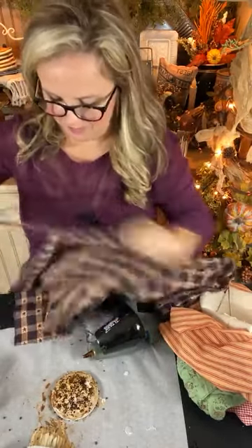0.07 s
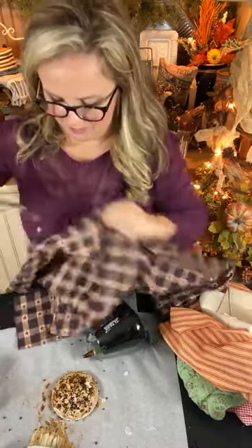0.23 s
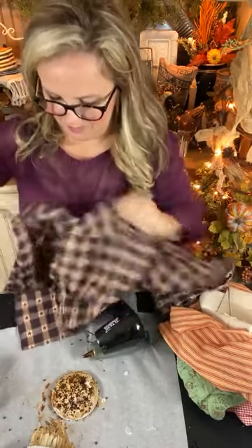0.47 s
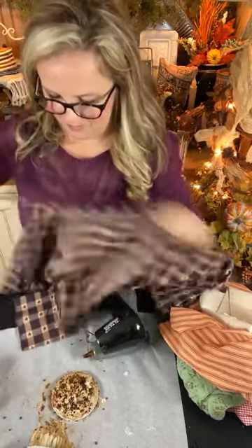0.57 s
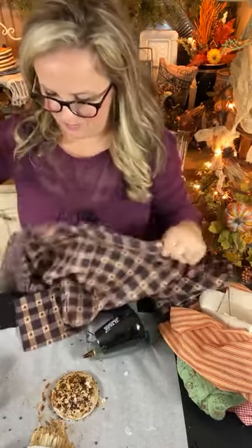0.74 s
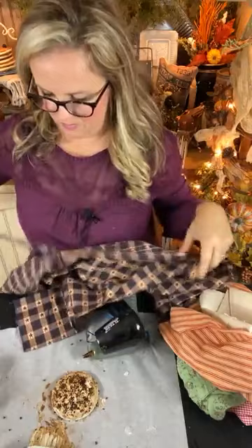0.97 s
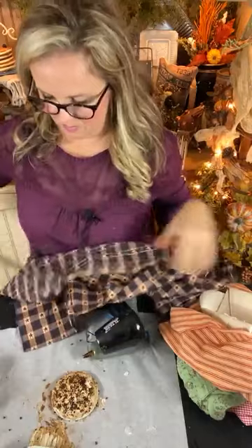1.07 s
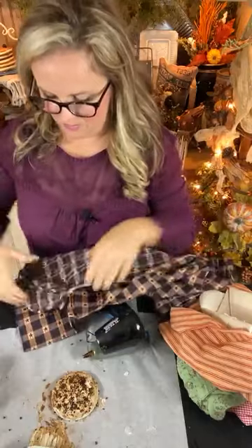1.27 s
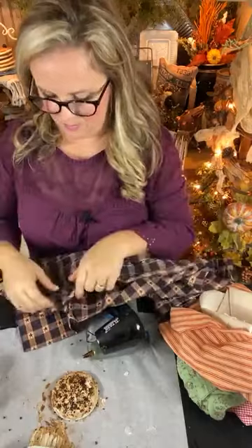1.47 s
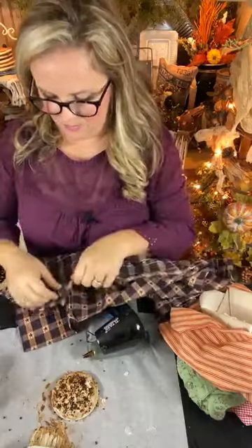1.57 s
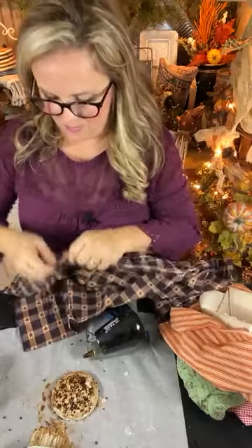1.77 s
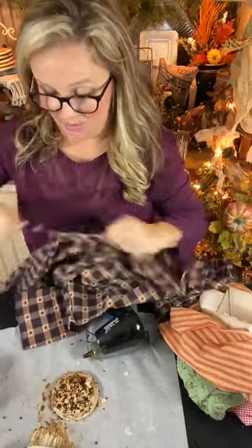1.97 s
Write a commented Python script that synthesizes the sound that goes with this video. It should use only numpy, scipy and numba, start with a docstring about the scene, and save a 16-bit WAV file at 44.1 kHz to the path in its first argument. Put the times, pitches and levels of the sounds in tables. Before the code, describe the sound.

Cloth ripped by hand in four quick, sharp pulls, followed by faint rustling.

```python
"""Ripping cloth up close

Cloth is ripped by hand in four quick pulls: threads snap in dense runs and ring the taut weave.
Each pull jolts the microphone with low thumps and slow pushes of air; the biggest overload it.
Hands rustle, and a small furnished room answers briefly over a machine's hiss and steady tone."""
import sys
import numpy as np
from scipy import signal
from scipy.fft import rfft, irfft
from scipy.io import wavfile
from scipy.ndimage import uniform_filter1d
from numba import njit

SR = 44100
rng = np.random.default_rng(int(sys.argv[2]) if len(sys.argv) > 2 else 0)


def transcribe(signal):
    """Save signal, clipped to [-1, 1], as a 16-bit WAV file at the path in sys.argv[1]."""
    frames = np.atleast_2d(signal).T
    limited = np.clip(frames, -1, 1)
    pcm = np.round(limited * 32767).astype(np.int16)
    wavfile.write(sys.argv[1], SR, pcm)


N = 88376

# The shape of each rip, one list of breakpoints per pull:
# time_s, level_db, low_lift_db, mid_lift_db, top_lift_db, flap_db
RIP_SHAPES = [
    [(0, -27, 8, -5, 1, -18), (.005, -34, 11, 11.5, -9, -30.5), (.011, -32, -21, 1, 0, -26),
     (.03, -40, -12, 0.5, -13, -51), (.06, -55, 3, -6, -1, -45)],
    [(.221, -38, 0, 15, 2, -22), (.225, -25, -4.5, 3, 6.5, -25.5), (.233, -20, 2, -1.5, -6.5, -31),
     (.24, -21.5, -1, 3, -6, -27), (.25, -23, 4, 3.5, -3, -22), (.263, -25, 4, 1.5, -2, -36),
     (.276, -25, -5.5, 1, -8.5, -23.5), (.279, -28, 6, -1.5, -5, -33.5), (.3, -55, -5, 4, 11, -48)],
    [(.488, -40, 2, 0, 0, -30), (.491, -14, 0.5, -6.5, -6, -26), (.497, -24.5, 2, 2, 3, -38),
     (.505, -15, 6.5, -4.5, -2.5, -29), (.515, -25.5, -9, 4, 4.5, -31), (.527, -29.5, 7, 1, 2.5, -35),
     (.53, -38, -6, -3, 6, -42), (.545, -53, 0, -5, -5, -50)],
    [(.7365, -44, 11, 13, 27.5, -28), (.7385, -30, -1.5, -1.5, 0, -24), (.7405, -20.5, 7, -4, -8, -40),
     (.747, -24, 1.5, 6.5, 6.5, -28), (.758, -22.5, 0.5, 4, 3, -23.5), (.77, -22.5, 3, 5.5, -1, -32),
     (.777, -24.5, 1, -2, 2, -28), (.78, -30, 5, 0.5, -2, -35), (.792, -32, -1.5, -4, -4.5, -42),
     (.81, -56, -9, 0, 2, -44)],
]
# Single threads that crack out of the run: start_s, level_db
LOUD_THREADS = [(.003, -15.5), (.2265, -24), (.2315, -5), (.2345, -16), (0.247, -18), (.2555, -25),
                (.26, -10), (0.264, -12.5), (0.271, -16), (0.491, -17), (.523, -16), (0.743, -20),
                (0.7873, -20)]
SNAPS_PER_S, SNAP_SCATTER_DB, FUZZ_DB = 2500, 1.5, -3.5
BUNCH_DB, BUNCH_PER_S, CRACK_DECAY_S = 0.5, 350, .0007


def rips(t):
    """Threads snap in bunches over fibre fuzz and ring the weave; the taut sheet flaps low beneath."""
    gain, lift_db, flap_gain = np.zeros(N), np.zeros((3, N)), np.zeros(N)
    for shape in RIP_SHAPES:
        time_s, level_db, *lifts, flap_db = np.array(shape).T
        pulling = (t >= time_s[0]) & (t <= time_s[-1])
        gain[pulling] = undb(np.interp(t[pulling], time_s, level_db))
        flap_gain[pulling] = undb(np.interp(t[pulling], time_s, flap_db))
        lift_db[:, pulling] = [np.interp(t[pulling], time_s, lift) for lift in lifts]
    chance, polarity, size = rng.random((3, N))
    snap_gain = undb(-SNAP_SCATTER_DB * np.log(size + .03))  # many small, a few large
    snaps = (chance < SNAPS_PER_S / SR) * np.sign(polarity - .5) * snap_gain
    run = unit(snaps) + undb(FUZZ_DB) * rng.standard_normal(N)
    run *= undb(BUNCH_DB * walk(BUNCH_PER_S))
    weave_rms = np.sqrt(np.mean(weave(run, (0, 0, 0)) ** 2))
    drive = run * gain
    crack = rng.standard_normal(N)
    for start_s, level_db in LOUD_THREADS:
        decay = (t >= start_s) * np.exp(-np.abs(t - start_s) / CRACK_DECAY_S)
        drive += undb(level_db) * crack * decay
    flap = unit(band(rng.standard_normal(N), hz=172, width_hz=360))
    flap *= uniform_filter1d(flap_gain, size=200)
    return weave(drive / weave_rms, lift_db), flap


# Crossovers between the low, unlifted, mid and top ranges: edge_hz
CROSSOVERS_HZ = [2000, 5000, 10000]
# Resonances of the taut weave: pitch_hz, width_hz, gain_db
WEAVE_MODES = [(291, 520, -3), (740, 840, -8), (1234, 680, 0.5), (1770, 700, -1.5), (2520, 1220, -4.5),
               (3783, 1540, -4), (6295, 2100, -2.5), (7390, 1000, -1.5), (8395, 2150, -2.5),
               (10870, 5800, -10.5), (14300, 6700, -4.5)]
FLUTTER_DB, FLUTTER_PER_S = 2, 500


def weave(drive, lift_db):
    """The weave colours each snap; every resonance flutters on its own."""
    low, mid, top = lift_db
    out = np.zeros(N)
    for k, (pitch_hz, width_hz, gain_db) in enumerate(WEAVE_MODES):
        range_db = (low, 0, mid, top)[np.searchsorted(CROSSOVERS_HZ, pitch_hz)]
        gain = undb(gain_db + range_db + FLUTTER_DB * walk(FLUTTER_PER_S))
        out += (-1) ** k * band(drive * gain, pitch_hz, width_hz)  # neighbours alternate in polarity
    return out


# Low thumps as each pull jolts the microphone: peak_s, signed_peak, rise_ms, fall_ms
JOLTS = [(.008, 0.036, 1.4, 0.48), (0.197, -0.18, 1.6, 0.72), (0.219, 0.84, 2.4, 2.16),
         (0.232, -.2, 1.9, 2.7), (0.243, 0.2, 1.6, 7.5), (0.249, -0.26, 1.3, 1.25), (.481, .6, 1.46, 1.2),
         (.485, -0.61, 1.3, 2.5), (.489, -2.4, 0.92, 0.81), (.4945, 1.55, 1.88, 3.5), (.506, -.3, 2.4, 1),
         (.523, -0.16, 2.4, 1.7), (0.527, .3, 2.2, 2), (0.688, -0.1, 0.49, 3), (.731, -0.52, 7.7, 1.27),
         (0.7357, -1.9, 1.78, 0.9), (.7385, 0.44, 0.81, 0.38), (0.743, 0.31, 1.8, 8.8),
         (.756, 0.61, 0.89, 3.1), (.778, 0.23, 2, 2.7), (0.788, 0.3, 1.5, 4.3)]
# Slow pushes of air from the swung cloth: peak_s, signed_peak, width_ms
AIR_SWELLS = [(0.018, -0.17, 17), (0.182, 0.26, 40), (0.292, -0.38, 41), (.39, 0.23, 26),
              (0.448, 0.52, 16.4), (0.516, -0.52, 14.4), (0.556, .35, 14), (0.608, -.3, 27.9),
              (.69, 0.26, 27.8), (0.771, -0.32, 19), (.91, 0.27, 19.3), (1.032, -.36, 43.5),
              (1.172, .32, 37.2), (1.342, 0.3, 32.7), (1.55, -0.11, 220), (1.68, -0.087, 19),
              (1.798, 0.25, 46), (1.968, -0.073, 32)]


def pushes(t, rows):
    """Bell-shaped pressure pulses, with one width or a separate rise and fall."""
    out = np.zeros(N)
    for peak_s, signed_peak, *widths_ms in rows:
        sigma_s = np.where(t < peak_s, widths_ms[0], widths_ms[-1]) / 1000
        out += signed_peak * np.exp(-.5 * ((t - peak_s) / sigma_s) ** 2)
    return out


# Swell and fade of the handling rumble: time_s, level_db
RUMBLE_LEVELS = [(0, -33.5), (.12, -39.5), (.2, -22), (.3, -37), (.37, -41.5), (.47, -29), (.55, -26),
                 (.62, -35), (.7, -22.5), (.8, -33), (.95, -42), (1.1, -47.5), (1.3, -47.5), (1.85, -49),
                 (2, -37.5)]


def rumble(t):
    """Handling makes a deep, uneven rumble."""
    noise = band(rng.standard_normal(N), hz=32.5, width_hz=46)
    return unit(noise) * undb(np.interp(t, *np.array(RUMBLE_LEVELS).T))


# Hands brushing on cloth: time_s, level_db, centre_hz
RUSTLE_SHAPE = [(0, -50, 3200), (.15, -56.5, 3100), (0.401, -54, 3000), (.9, -57, 3100), (1.2, -60, 3100),
                (1.45, -63.5, 3300), (1.85, -73, 4010), (1.93, -61, 7630), (1.985, -62.5, 8600),
                (2, -50, 9300)]


def rustle(t):
    """Faint brushing that brightens at the end as the grip tightens."""
    time_s, level_db, centre_hz = np.array(RUSTLE_SHAPE).T
    friction = rng.standard_normal(N) * undb(0.99 * walk(per_s=59.8))
    brush = band(friction, np.interp(t, time_s, centre_hz), width_hz=4000)
    return unit(brush) * undb(np.interp(t, time_s, level_db))


# The room's tail, band by band: centre_hz, t60_s
ROOM_DECAYS = [(700, 0.16), (2000, 0.29), (4500, 0.19), (8000, 0.22), (13000, 0.14)]
ROOM_DB, ROOM_BUILD_S = -17, 0.0048


def room(x):
    """Dense reflections build over a few ms and linger longest in the mids."""
    t = np.arange(SR // 2) / SR
    tail = sum(band(rng.standard_normal(len(t)), centre_hz, 1.2 * centre_hz) * undb(-60 * t / t60_s)
               for centre_hz, t60_s in ROOM_DECAYS)
    tail *= np.clip(t / ROOM_BUILD_S, 0, 1)
    tail /= np.sqrt(np.sum(tail ** 2))
    return signal.fftconvolve(x, tail)[:N] * undb(ROOM_DB)


# Colour of the machine's hiss: frequency_hz, relative_db
HISS_COLOUR = [(40, -4.5), (120, -7), (255, -1.5), (400, -3.5), (600, -3), (900, -6), (1350, -2),
               (1650, -11.5), (1950, -20), (3300, -22), (4900, -24.5), (5600, -33), (9500, -35.5),
               (11000, -51.5), (16000, -45)]
# The machine's tone, multiples of one rotation: pitch_hz, rms_db, waver_hz
MACHINE_TONES = [(206.2, -64, 1), (412.4, -52, 2), (618.7, -63, 1), (824.9, -44.5, .3), (1649.8, -71, .6),
                 (2474.5, -73, .8)]
HISS_DB, FLICKER_DB = -44, .5


def machine():
    """A turning machine: lightly flickering hiss and a tone whose partials barely waver."""
    bins_hz = np.fft.rfftfreq(N, 1 / SR) + 1
    frequency_hz, relative_db = np.array(HISS_COLOUR).T
    colour = undb(np.interp(np.log(bins_hz), np.log(frequency_hz), relative_db, left=-40))
    hiss = irfft(rfft(rng.standard_normal(N)) * colour, N)
    out = unit(hiss) * undb(HISS_DB + FLICKER_DB * walk(per_s=25.4))
    for pitch_hz, rms_db, waver_hz in MACHINE_TONES:
        phase = 2 * np.pi * np.cumsum(pitch_hz + waver_hz * walk(per_s=8.1)) / SR
        out += np.sqrt(2) * undb(rms_db) * np.sin(phase)
    return out


def undb(db):
    """Decibels to gain."""
    return 10 ** (np.asarray(db) / 20)


def unit(x):
    """Scale to an rms of 1."""
    return x / np.sqrt(np.mean(x ** 2))


def walk(per_s):
    """A smooth wobble of rms 1: random steps, slewed twice."""
    hold = int(SR / per_s)
    steps = np.repeat(rng.standard_normal(N // hold + 1), hold)
    return unit(uniform_filter1d(uniform_filter1d(steps, hold), hold)[:N])


@njit
def svf(x, hz, width_hz):
    """State-variable band-pass, gain 1 at a centre that may move."""
    out, band_state, low_state = np.empty(len(x)), 0., 0.
    for i in range(len(x)):
        g, damping = np.tan(np.pi * hz[i] / SR), width_hz / hz[i]
        passed = (band_state + g * (x[i] - low_state)) / (1 + g * (g + damping))
        band_state = 2 * passed - band_state
        low_state += 2 * g * passed
        out[i] = damping * passed
    return out


def band(x, hz, width_hz):
    """A steep resonance: the band-pass twice."""
    hz, width_hz = hz + np.zeros(len(x)), float(width_hz)
    return svf(svf(x, hz, width_hz), hz, width_hz)


def scene():
    """Rips and their room up front, low pushes beneath, hands and machine behind; mono."""
    t = np.arange(N) / SR
    tear, flap = rips(t)
    cloth = tear + flap + room(tear)
    low_end = pushes(t, JOLTS) + pushes(t, AIR_SWELLS) + rumble(t)
    return (cloth + low_end + rustle(t) + machine())[None]


CLIP_AT, CLIP_HARDNESS, TOP_HZ = .96, 7, 15800


def record(dry):
    """The input stage flattens the biggest jolts; a steep low-pass cuts the very top."""
    clipped = dry / (1 + np.abs(dry / CLIP_AT) ** CLIP_HARDNESS) ** (1 / CLIP_HARDNESS)
    low_pass = signal.ellip(11, .2, 100, TOP_HZ, fs=SR, output="sos")
    return signal.sosfilt(low_pass, clipped)


dry = scene()
out = record(dry)
transcribe(out)
```